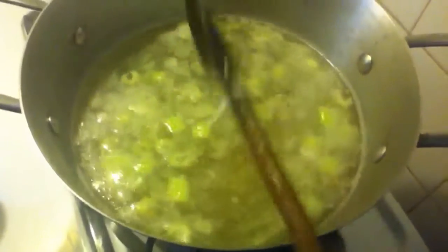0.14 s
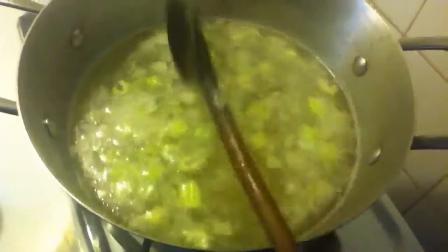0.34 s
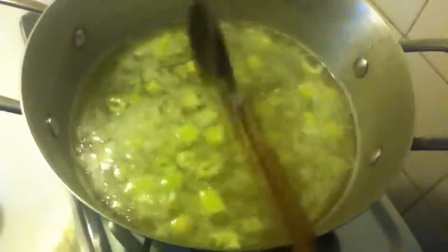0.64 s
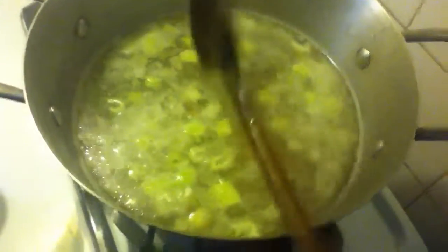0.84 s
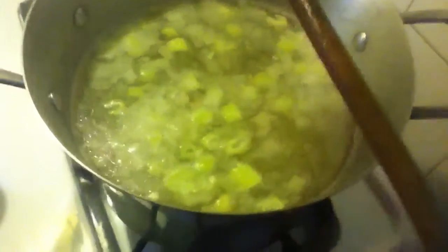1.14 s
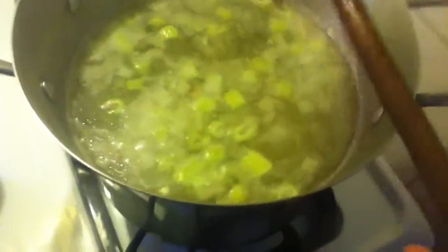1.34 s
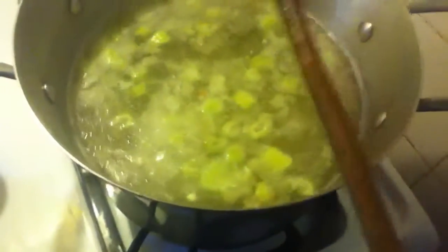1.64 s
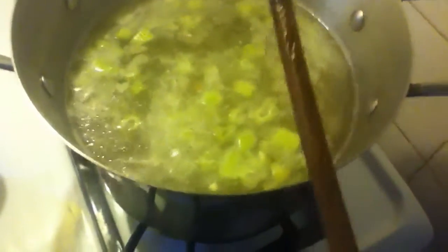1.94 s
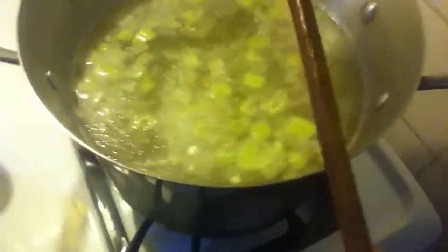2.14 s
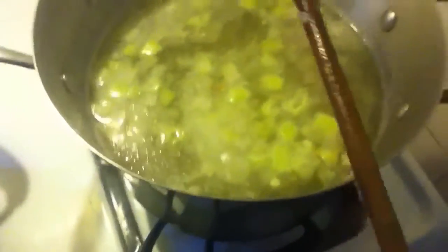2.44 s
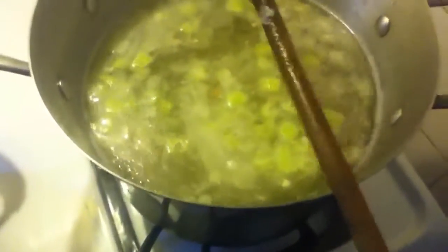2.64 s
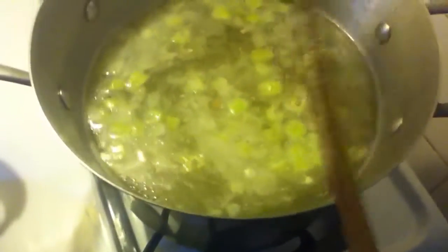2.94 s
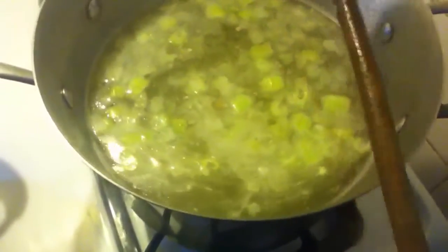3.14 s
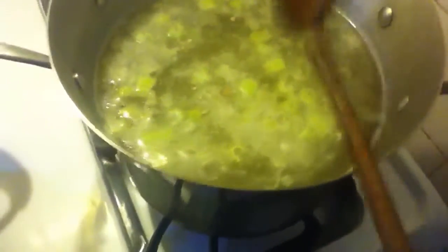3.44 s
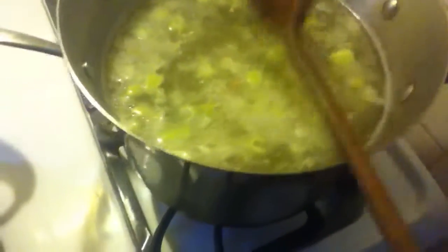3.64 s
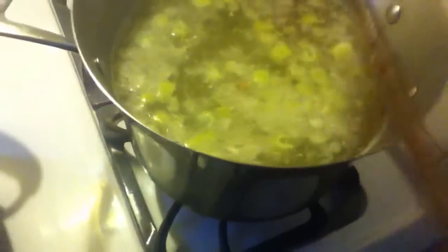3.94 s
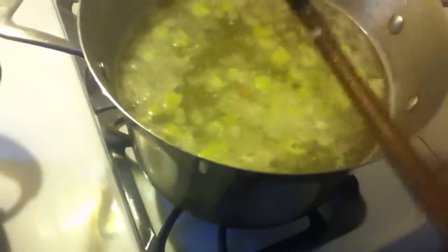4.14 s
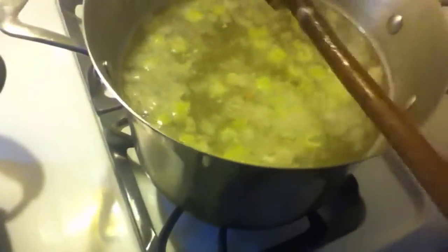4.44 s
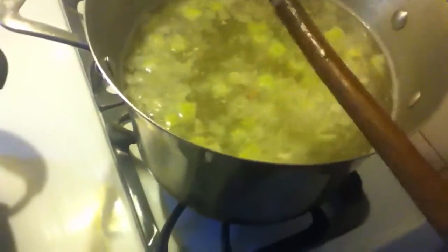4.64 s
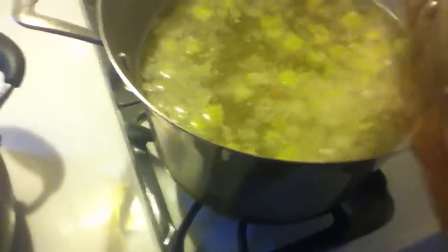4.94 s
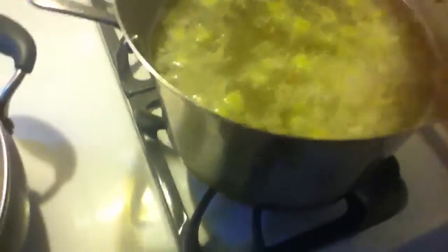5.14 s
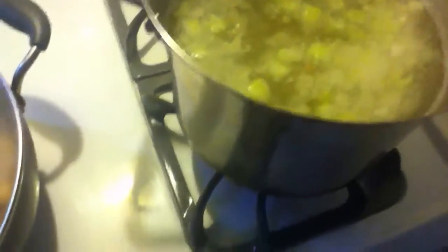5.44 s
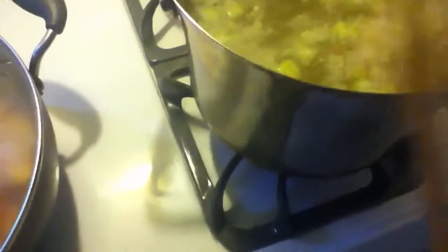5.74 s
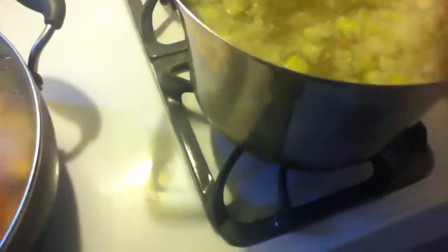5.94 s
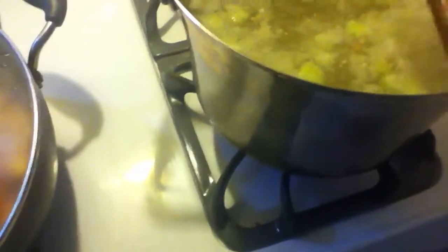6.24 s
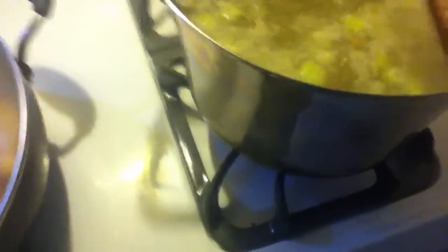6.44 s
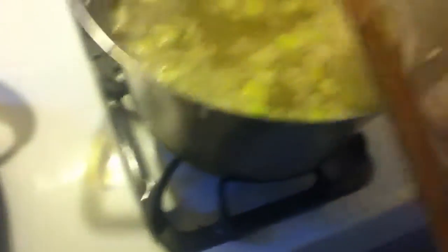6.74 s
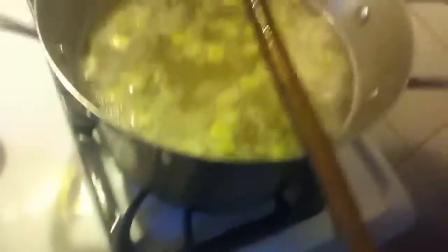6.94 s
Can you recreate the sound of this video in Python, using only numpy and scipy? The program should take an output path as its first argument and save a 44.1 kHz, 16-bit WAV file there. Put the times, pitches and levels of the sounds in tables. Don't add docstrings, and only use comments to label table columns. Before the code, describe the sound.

Close to a phone microphone, a wooden spoon raps a metal saucepan: five quick, loud knocks, a pause of gentle bubbling, three brighter knocks, another pause, then four thinner, more ringing ones. Each has a hard click, short damped metallic ring and low stove thud, with slight rattles and a brief hard kitchen echo. Quiet boiling and steam hiss run throughout.

```python
import sys
import numpy as np
from scipy import signal
from scipy.fft import rfft, irfft
from scipy.io import wavfile
from scipy.ndimage import uniform_filter1d

SR = 44100
rng = np.random.default_rng(int(sys.argv[2]) if len(sys.argv) > 2 else 0)


def wrap_up_sound(samples):
    columns = np.atleast_2d(samples).T
    tamed = np.clip(columns, -1, 1)
    steps = np.round(tamed * 32767).astype(np.int16)
    wavfile.write(sys.argv[1], SR, steps)


def how_loud(loudness_db):
    steps = np.asarray(loudness_db, float) / 20
    return 10 ** steps


N = 313330


def level(x, db):
    return x * how_loud(db) / np.sqrt(np.mean(x ** 2))


def fade(t, t60):
    return np.exp(-np.log(1000) * t / t60)


def add(out, s, x):
    i = int(s * SR)
    out[i:i + len(x)] += x[:len(out) - i]


def colour(x, table):
    hz, db = np.transpose(table)
    f = np.maximum(np.fft.rfftfreq(len(x), 1 / SR), 1)
    gain = how_loud(np.interp(np.log(f), np.log(hz), db))
    return irfft(rfft(x) * gain, len(x))


def band(x, hz, width):
    low = hz / (1 + width / 2)
    high = min(hz * (1 + width / 2), SR / 2 - 500)
    return signal.sosfilt(signal.butter(2, [low, high], "band", fs=SR, output="sos"), x)


def split(x, centres):
    f = np.log(np.maximum(np.fft.rfftfreq(len(x), 1 / SR), 1))
    spectrum = rfft(x)
    return [irfft(spectrum * np.interp(f, np.log(centres), row), len(x)) for row in np.eye(len(centres))]


def walk(rate):
    hold = int(SR / rate)
    steps = np.repeat(rng.standard_normal(N // hold + 1), hold)
    return 1.3 * uniform_filter1d(uniform_filter1d(steps, hold), hold)[:N]


# (f/Hz, t60/s, level/dB)
KITCHEN = [(102, 0.72, -21.5), (252, 0.73, -18.5), (606, 0.6, -20), (1500, 0.41, -22.5),
           (4100, 0.35, -28.5), (10000, 0.14, -49)]


def kitchen(x):
    t = np.arange(SR) / SR
    hz, t60, db = np.transpose(KITCHEN)
    parts = split(rng.standard_normal(SR), hz)
    tail = sum(how_loud(d) * part * fade(t, s) for part, s, d in zip(parts, t60, db))
    tail = tail * (1 - fade(t, 0.0061)) * how_loud(-8.5)
    return signal.fftconvolve(x, tail)[:N]


def after_blows(attack_s, release_s):
    since = np.maximum(np.arange(N) / SR - np.array(KNOCKS)[:, :1], 0)
    return np.sum((1 - np.exp(-since / attack_s)) * np.exp(-since / release_s), axis=0)


def bubble(hz, cycles, glide):
    turn = np.arange(int(2 * cycles * SR / hz)) * hz / SR
    tone = np.sin(2 * np.pi * turn * (1 + glide * turn / cycles))
    return tone * np.exp(-3 * turn / cycles)


# (f/Hz, width/Hz, level/dB)
HOLLOW = [(760, 26, 4.5), (970, 70, -5.5), (1250, 310, 2.5), (1653, 57, 7), (1870, 67, 4), (2070, 130, 1),
          (2400, 200, 3), (6030, 990, 6.5)]


def hollow(x):
    f = np.fft.rfftfreq(N, 1 / SR)
    bells = sum(db * np.exp(-((f - hz) / width_hz) ** 2 * 2) for hz, width_hz, db in HOLLOW)
    return irfft(rfft(x) * how_loud(bells), N)


# (f/Hz, density level/dB)
BROTH = [(15, -61.5), (25, -35), (43, -5), (87, -21), (124, -4), (178, -19.5), (197, -8.5), (288, -0.5),
         (331, -22), (374, -6.5), (536, -4.5), (668, -8), (1270, -13), (2660, -20), (3000, -18.5),
         (3900, -86), (6600, -120)]
# (f/Hz, density level/dB)
STEAM = [(1410, -27), (2400, -5.5), (2680, -25), (3070, -1), (3320, 1), (5270, -1.5), (5750, -5.5),
         (7890, -1.5), (15100, -14), (16000, -22)]


def soup():
    high_db = 3 - 1.93 * after_blows(attack_s=0.027, release_s=1.36)
    low_db = high_db + 4.5 * after_blows(attack_s=0.026, release_s=0.15)
    grains = np.zeros(N)
    for at, pitch, size in rng.random((6000, 3)):
        loudness = how_loud(-3.0 * np.log(size + 0.0066))
        add(grains, at * N / SR, loudness * bubble(260 * 9 ** pitch ** 1.2, cycles=4, glide=0.093))
    rumble = level(colour(rng.standard_normal(N), BROTH), -49.0)
    hiss = level(colour(rng.standard_normal(N), STEAM), -55)
    out = level(grains, -53.0) * how_loud(low_db)
    swell = walk(24.91)
    bands_hz = 30 * 2 ** np.arange(0, 9.1, .5)
    for hz, part in zip(bands_hz, split(rumble + hiss, bands_hz)):
        share = np.clip(np.log2(hz / 800) / 2, 0, 1)
        band_db = (1 - share) * low_db + share * high_db
        out = out + part * how_loud(band_db + .8 * swell + .8 * walk(22))
    return hollow(out)


# (t/s, peak level/dB, f/Hz)
POPS = [(1.53, -43, 420), (1.553, -39, 366), (1.79, -38, 515), (1.824, -41, 278), (2.356, -39, 303),
        (2.391, -26.5, 1290), (2.43, -34.5, 516), (2.589, -33, 549), (2.863, -35.5, 285), (3.085, -41, 238),
        (3.183, -32, 565), (3.213, -36, 560), (3.256, -36, 292), (3.291, -31.5, 522), (3.391, -36, 387),
        (4.589, -39, 564), (4.733, -43, 388), (4.825, -46, 547), (4.957, -40, 590), (5.086, -32, 385),
        (5.145, -34, 605), (5.224, -37, 540), (5.441, -39, 720),
        (1.965, -40, 417),
    (2.6, -35, 560),
    (2.617, -35, 1130),
    (2.325, -40, 1200),
    (4.512, -41, 1040),
    (4.6, -42, 1330),
    (4.734, -39, 1770),
    (6.474, -37, 750),
    (6.548, -45, 3050),
    (6.95, -55, 500),
]
# (t/s, level/dB, centre f/Hz)
SPITS = [(1.469, -51, 8950), (2.21, -48.5, 8900), (2.499, -44.5, 4400), (2.62, -45, 5000),
         (3.05, -47, 5000), (3.189, -44, 7900), (3.29, -45, 6000), (4.38, -54, 5060), (4.495, -49, 8100),
         (4.696, -54, 10000), (4.735, -52, 7000), (5.005, -51, 8000), (5.146, -52, 6000),
         (5.28, -54, 10000), (5.41, -49, 7000), (6.475, -49.5, 5000), (6.591, -55, 8000), (6.70, -52, 4960)]


def bursts():
    out, t = np.zeros(N), np.arange(SR // 6) / SR
    for s, db, hz in POPS:
        add(out, s, how_loud(db - 3) * bubble(hz, cycles=7 + hz / 70, glide=.03))
    for s, db, hz in SPITS:
        puff = level(band(rng.standard_normal(len(t)), hz, 0.8), db)
        add(out, s, puff * fade(t, 0.09) * (1 - fade(t, 0.0071)))
    return out


# (t/s, level/dB, centre f/Hz, t60/s)
JINGLES = [(.619, -33, 10000, .1), (.622, -29, 5500, .09), (.27, -46, 5450, .3), (3.697, -31, 6300, .07),
           (3.699, -31, 8200, .06), (3.697, -37, 10500, .07), (6.006, -30, 5500, .07),
           (5.634, -33, 3570, .25), (5.83, -36, 3500, .2), (6.2, -40, 5400, .35), (3.49, -30, 2405, .3),
           (3.955, -40, 5400, .3)]


def jingles():
    out, t = np.zeros(N), np.arange(SR // 3) / SR
    for s, db, hz, t60 in JINGLES:
        add(out, s, level(band(rng.standard_normal(len(t)), hz, 0.05), db) * fade(t, t60))
    return out


# (f/Hz, width/Hz, t60/s, level/dB)
STOVE = [(99.7, 30, 1.7, -41.5), (127.6, 25.4, 2.15, -38.5), (180, 43, 0.28, -54), (126, 20.3, 0.4, -27.5),
         (258.3, 53, 0.25, -29), (397.8, 33, 0.37, -31.5), (560, 103, 0.43, -31.5)]


def stove(t, bright_db):
    thud, thud_db = 0, min(-2.5 - 0.82 * bright_db, 16)
    for hz, width_hz, t60, db in STOVE:
        rough = level(band(rng.standard_normal(SR * 3), hz, width_hz / hz)[SR:], 0)
        hum = how_loud(db + thud_db) * (.5 * np.sin(2 * np.pi * hz * t) + 1.3 * rough)
        thud = thud + hum * fade(t, t60) * (1 - fade(t, 0.021))
    return thud


def ring(t, modes, place, bright_db, signs):
    out = 0
    for sign, (hz, t60, *db) in zip(signs, modes):
        gain_db, detune, phase = rng.standard_normal(3) * [.8, .0015, .1]
        place_db = np.interp(place, np.arange(len(db)), db)
        gain = sign * how_loud(place_db + gain_db + bright_db * np.log2(hz / 2000) / 2)
        out = out + gain * np.sin(2 * np.pi * hz * (1 + detune) * t + phase) * fade(t, t60)
    return out


# (f/Hz, density level/dB)
CLATTER = [(60, -11), (150, -9), (700, -6.5), (1300, -3.5), (2300, -4.5), (3500, -7), (6500, -9),
           (10000, -20), (13000, -32), (16000, -58)]
# (f/Hz, t60/s, level/dB at place 0, at place 1, at place 2)
HANDLE = [(1290, 0.017, -12.5, -17.5, -12), (2242, 0.03, -31, -23, -7), (3630, 0.052, -32, -28, -16),
          (4205, 0.0053, -5, -23, -23), (5280, 0.03, -13, -20, -6.5), (6740, 0.026, -18, -21, -8),
          (9200, 0.02, -30, -19.5, -22)]
# (f/Hz, t60/s, level/dB at place 0, at place 1, at place 2)
PAN = [(593, 0.097, -18, -20, -12), (800, 0.18, -21.5, -22.5, -13), (877, 0.15, -23, -18.5, -18),
       (1060, 0.13, -23, -25, -24), (1194, 0.057, -14, -8.5, -15), (1302, 0.05, -16, -3.5, -5),
       (1626, 0.017, -9, -3.5, -2.5), (1812, 0.023, -7, -12, -10), (1950, 0.054, -8.5, -25, -7.5),
       (2026, 0.045, -7.5, -31, -13), (2208, 0.044, -3, -2, -3.5), (2377, 0.11, -8.5, -14, -18),
       (2416, 0.16, -11.5, -28, -14), (2540, 0.031, -6, -14, -4),
       (2876, 0.051, -21.5, -11, -7.5), (3206, 0.029, -18, -17, -9.5), (3378, 0.032, -25, -24, 3),
       (3520, 0.03, -18, -31, 3.5), (4102, 0.03, -12.5, -12, -15), (4290, 0.034, -19, -16.5, -6.5),
       (4600, 0.036, -14.5, -14.5, -27), (4990, 0.021, -9, -14, -2.5), (5080, 0.027, -30, -20, -13),
       (5900, 0.043, -15.5, -19, -10.5), (6260, 0.011, -15, -19.5, -18), (6480, 0.037, -21, -17, -7),
       (7820, 0.025, -13, -30, -15), (7880, 0.016, -13, -24, -17)]


def knock(place, bright_db, rattle_db):
    t = np.arange(2 * SR) / SR
    short = t[:SR // 3]
    blow, wall = np.zeros(len(t)), np.zeros(len(t))
    click = -np.exp(-((np.arange(14) - 6) / 2.7) ** 2)
    add(blow, 0, how_loud(-1) * click)
    noise = level(colour(rng.standard_normal(len(short)), CLATTER), 0)
    noise = noise + (how_loud(bright_db) - 1) * band(noise, 7600, 1.0)
    crack = how_loud(-15) * fade(short, 0.044)
    rattle = how_loud(rattle_db - 8.5) * fade(short, 0.22) * (1 - fade(short, 0.033))
    add(blow, .0003, noise * (crack + rattle))
    add(wall, 0, how_loud(-4.0) * ring(short, HANDLE, place, bright_db, -np.ones(len(HANDLE))))
    metal = PAN
    pan = ring(short, metal, place, bright_db, (-1) ** np.arange(len(metal)))
    add(wall, 0, how_loud(-3.5) * pan * (1 - fade(short, 0.0015)))
    return blow + wall + stove(t, bright_db), blow + how_loud(-19) * wall


# (t/s, peak level/dB, place on the rim 0-2, brightness level/dB, rattle level/dB)
KNOCKS = [(0.205, -1.5, 0.2, -1, -15.5), (0.4257, -2.5, 0.13, -2, -21), (.6028, -2, 0.13, 3, -11.5),
          (0.7882, -6, 0.08, -1, -16.5), (0.9715, -2.5, 0.065, 3.5, -15.5), (3.4789, -3, 1.05, 3.5, -19.5),
          (3.6824, -3, 0.87, 5, -12.5), (3.898, -5.5, 1.1, 2, -13), (5.6288, -8, 1.92, 1.5, -15),
          (5.826, -8.5, 2, 2, -10), (5.99, -6, 1.71, 2.5, -8.5), (6.1726, -4.5, 1.74, 4.5, -13.5)]
# (t/s, peak level/dB, place 0-2, brightness level/dB, rattle level/dB)
REBOUNDS = [
    (0.618, -17.5, 0.11, -16, -28),
    (0.734, -31, 0.1, 3, -4),
    (0.881, -28.5, 0.1, -6, -9),
    (1.065, -29, 0.1, -2, -5),
    (3.735, -29, 1.8, 8, -17),
    (3.951, -16.5, 1.4, -6, -6),
    (6.004, -22.5, 1.5, 15, -12),
    (6.269, -32.5, 1.8, -3, 6),
    (2.3933, -37, 1.1, -19, -8),
]


def spoon():
    out, send = np.zeros(N), np.zeros(N)
    for s, db, place, *touch in KNOCKS + REBOUNDS:
        near, far = knock(place, *touch)
        add(out, s, how_loud(db) * near)
        add(send, s, how_loud(db) * far)
    return out + jingles() + kitchen(send)


def scene():
    return (spoon() + bursts() + soup())[None]


def starve(x):
    frame, offset = 1024, 560
    gate, lead = np.zeros(N), np.zeros(N)
    for s, db, *_ in KNOCKS[:3] + KNOCKS[4:]:
        hit = int(s * SR)
        start = offset + int((np.floor((hit - offset) / frame - .5) + .5) * frame)
        block = offset + 64 + ((hit - offset - 64) // 128 - 1) * 128
        gate[start:block] = 1
        lead[block:hit] = how_loud(db - 42.0)
    f = np.fft.rfftfreq(N, 1 / SR)
    treble = irfft(rfft(x * (lead <= 0)) * np.clip(f / 300 - 7, 0, 1), N)
    noise = level(colour(rng.standard_normal(N), CLATTER), 0)
    return x - treble * uniform_filter1d(gate, 48) + noise * uniform_filter1d(lead, 48)


def holes(x):
    f, t, z = signal.stft(x, SR, nperseg=1024)
    since = t - np.array(KNOCKS)[:, :1] - .018
    need = np.max((since > 0) * np.exp(-np.maximum(since, 0) / .14), axis=0)
    dice = rng.random((len(f) // 3 + 1, len(t) // 4 + 1))
    dice = np.repeat(np.repeat(dice, 3, axis=0), 4, axis=1)[:len(f), :len(t)]
    share = .9 * np.clip((f[:, None] - 10000) / 4500, 0, 1) * need
    return signal.istft(z * (dice > share), SR, nperseg=1024)[1][:N]


def top_cut(x):
    return signal.sosfilt(signal.butter(12, 16650, fs=SR, output="sos"), x)


def record(dry):
    x = signal.sosfilt(signal.butter(3, 60, "high", fs=SR, output="sos"), dry)
    x = 0.79 * np.tanh(x / 0.81)
    x = signal.sosfiltfilt(signal.ellip(6, .1, 18, 15800, fs=SR, output="sos"), x)
    x = holes(starve(x[0]))[None]
    return top_cut(x)


dry = scene()
out = record(dry)
wrap_up_sound(out)
```